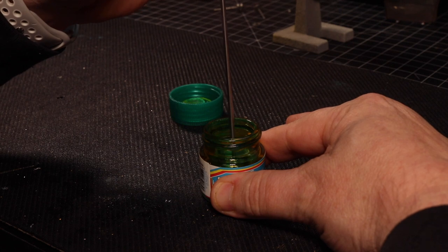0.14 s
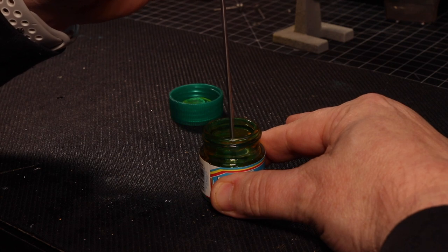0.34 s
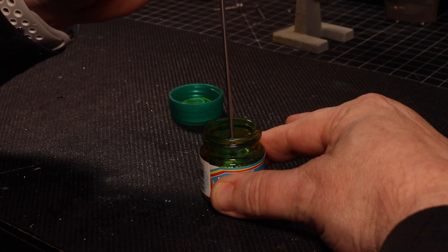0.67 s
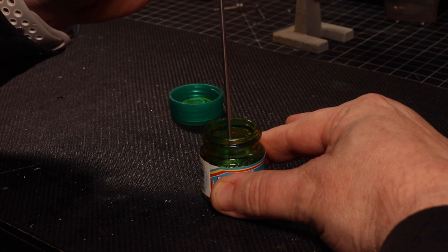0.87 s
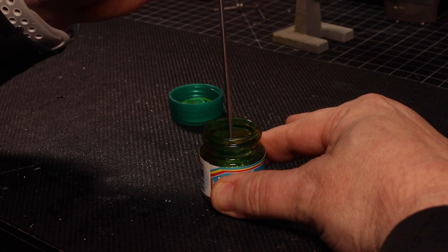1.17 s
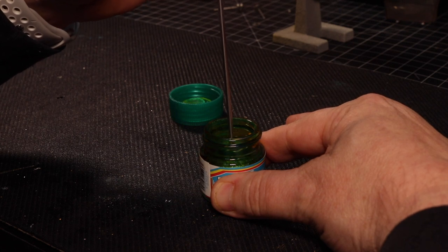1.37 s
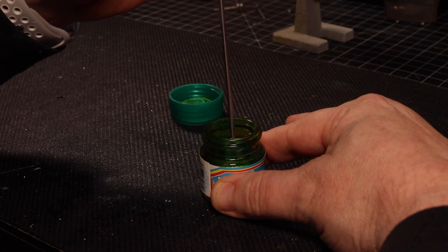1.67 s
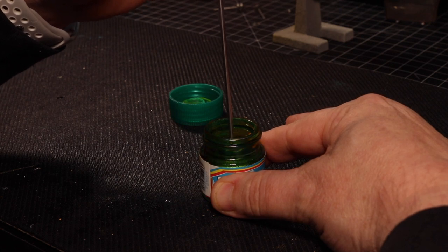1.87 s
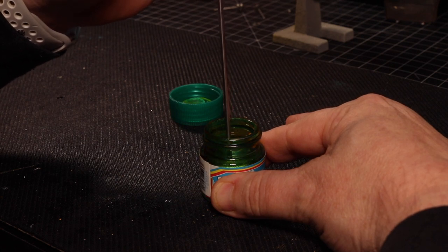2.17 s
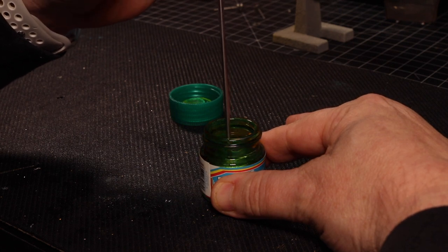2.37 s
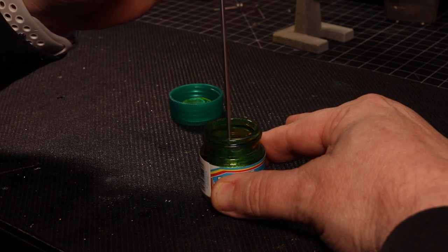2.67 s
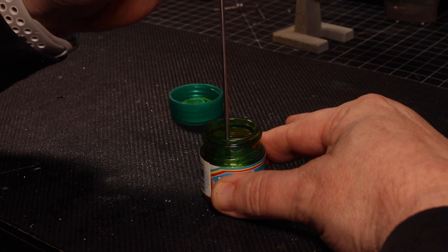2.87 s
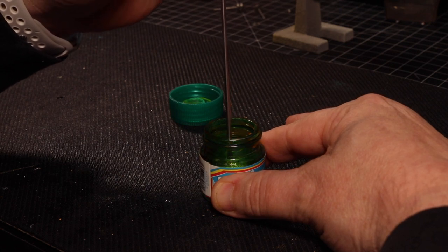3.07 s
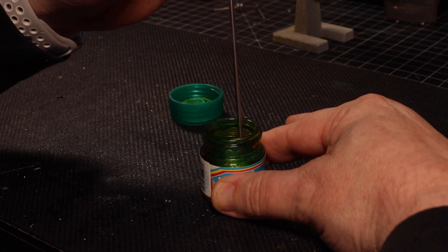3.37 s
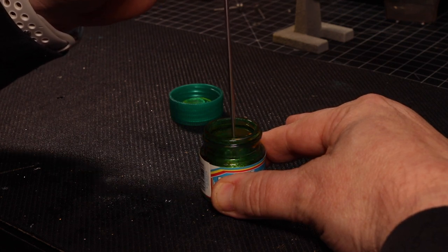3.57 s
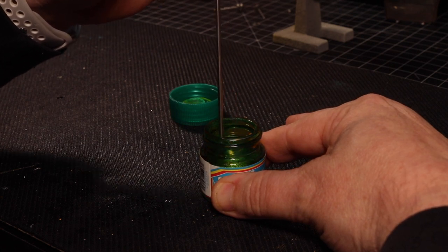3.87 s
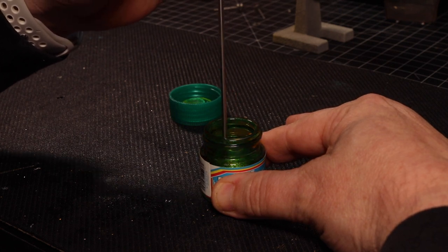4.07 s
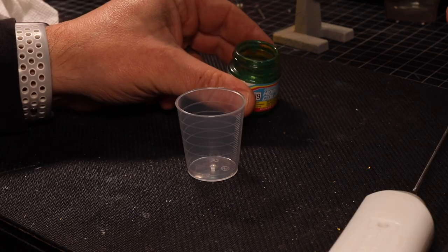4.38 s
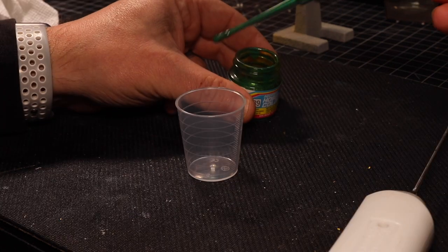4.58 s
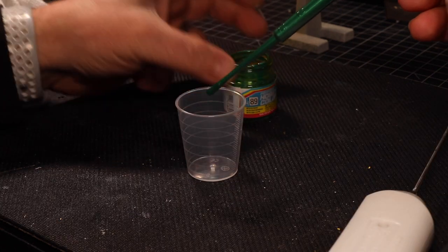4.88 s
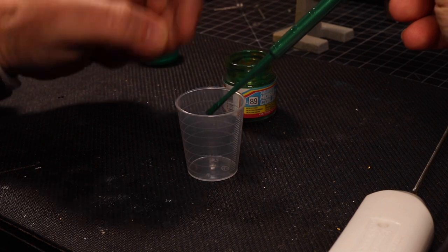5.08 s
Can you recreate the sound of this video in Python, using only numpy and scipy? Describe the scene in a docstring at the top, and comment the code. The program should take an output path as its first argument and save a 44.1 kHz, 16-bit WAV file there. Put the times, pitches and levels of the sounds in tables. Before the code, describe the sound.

A small battery mixer runs close to the microphone on a workbench, its motor giving a high whine while the thin shaft rattles rapidly. Paint fizzes and splatters inside a glass jar, mostly in the first two seconds. Later the paddle clatters against the glass three times. The mixer then cuts off suddenly, leaving a faint low room hum and a few light taps as the jar is handled.

```python
"""Close microphone on a workbench, where a small battery mixer stirs paint in a glass jar. From the start the
motor sings, its brushes click into a whine and the thin shaft rattles in its bearing. Bubbles fizz and droplets
splatter, most in the first two seconds. Near 2.9, 3.4 and 4.2 s the paddle clatters on the glass. Then the
scene changes to the quiet bench, with the room's low hum and a few light touches as the jar and a stirring
stick are handled."""
import sys
import numpy as np
from scipy import signal
from scipy.fft import rfft, irfft, next_fast_len
from scipy.io import wavfile
from scipy.ndimage import uniform_filter1d

SR = 44100
rng = np.random.default_rng(int(sys.argv[2]) if len(sys.argv) > 2 else 0)


def pcm_store(signal):
    """Save signal as 16-bit PCM."""
    levels = np.round(np.clip(np.atleast_2d(signal), -1, 1) * 32767)
    wavfile.write(sys.argv[1], SR, levels.astype(np.int16).T)


N = 231055
TIME = np.arange(N) / SR
SLOW_HZ, FAST_HZ = 183, 200  # the motor speeds meant by "slow" and "fast"

# The room's hiss. Each row: frequency in Hz, gain in dB.
ROOM_SPECTRUM = [(20, -20.5), (36, -13), (52, -17.5), (75, -8), (105, -6), (135, -15), (250, -15),
                 (520, -18), (1300, -22.5), (2500, -25.5), (6000, -28.5), (15500, -35.5)]
# Light touches on the bench. Each row: start in seconds, click in dB, thump in dB, click decay in seconds.
BENCH_TOUCHES = [(4.415, -48, -72, 0.0027), (4.82, -50, -35, .004), (4.88, -54, -62, 0.0081),
                 (4.925, -62, -70, .004), (4.992, -56, -46, .006), (5.002, -51, -56, 0.0049)]
# Fingers sliding on the jar. Each row: time in seconds, level in dB.
FINGER_SLIDE = [(4.8, -90), (4.87, -60), (4.93, -62), (5.0, -59.5), (5.06, -72), (5.24, -77)]
# A fingertip click. Each row: frequency in Hz, gain in dB.
CLICK_SPECTRUM = [(300, -11), (1000, -10), (1900, -6), (2400, -2), (2900, -2), (3600, -10), (6000, -18),
                  (15000, -28)]
# A thump on the mat. Each row: frequency in Hz, gain in dB.
THUMP_SPECTRUM = [(40, -19), (110, -1), (230, -0.5), (400, -3), (600, -26), (1500, -23), (5000, -49)]
# Paint thrown against the jar's wall. Each row: time in seconds, level in dB.
SPLATTER_LEVEL = [(0, -50.5), (.42, -52), (1.05, -50), (1.35, -44.5), (1.8, -42), (2.1, -44.5),
                  (2.3, -49.5), (4.2, -53)]
# The droplets' crackle. Each row: frequency in Hz, gain in dB.
DROPLET_SPECTRUM = [(1000, -26), (3400, -7.5), (4600, -1), (5700, -1), (6700, 2.5), (8500, -2.5),
                    (14000, -16.5)]
# How hard the paddle churns the paint. Each row: time in seconds, level in dB.
CHURN_LEVEL = [(0, -42.5), (.37, -48.5), (.43, -34), (.53, -36.5), (.6, -44), (.73, -40.5), (.81, -35),
               (.9, -38.5), (1.03, -41), (1.35, -36.5), (1.53, -38), (1.65, -41), (1.8, -37), (2.08, -35.5),
               (2.25, -44.5), (4.2, -65)]
# The paddle gulps air and the fizz swells. Each row: time in seconds, peak in dB.
AIR_GULPS = [(.335, -35), (.415, -33.5), (0.669, -30.5), (.765, -27.5), (0.979, -29), (1.115, -32),
             (1.17, -29.5), (1.29, -34), (1.4, -36), (1.55, -38), (1.79, -38), (1.91, -38), (1.97, -40)]
# Typical bubble pitch, lower as larger ones are beaten in. Each row: time in seconds, pitch in Hz.
BUBBLE_PITCH = [(.45, 2780), (.78, 2790), (1.15, 2650), (1.42, 2590), (1.55, 2800), (1.66, 2410),
                (1.95, 2560), (2.15, 2490)]
# Motor speed, sagging when the paddle drags. Each row: time in seconds, turns per second.
MOTOR_SPEED = [(0.0, 188.7), (0.09, 183.4), (0.22, 182.0), (0.51, 182.8), (0.56, 190.3), (0.63, 185.0),
               (0.73, 182.3), (0.82, 183.5), (0.86, 187.2), (1.07, 182.1), (1.09, 186.9), (1.18, 186.4),
               (1.23, 189.8), (1.33, 187.5), (1.45, 190.8), (1.53, 200.6), (1.55, 201.2), (1.61, 194.1),
               (1.77, 192.8), (1.86, 188.7), (1.96, 194.7), (2.09, 185.2), (2.27, 186.5), (2.34, 180.8),
               (2.4, 181.6), (2.41, 185.0), (2.48, 194.3), (2.6, 195.7), (2.84, 193.5), (2.94, 186.5),
               (3.17, 194.3), (3.35, 196.1), (3.43, 187.2), (3.52, 185.3), (3.57, 192.3), (3.66, 198.1),
               (4.1, 202.1), (4.19, 197.0)]
# The motor's tones. Each row: multiple of the speed, level in dB when slow, level in dB when fast.
MOTOR_TONES = [(1, -57, -63), (3, -61, -67), (5, -50.5, -53), (7, -43.5, -50), (8, -50, -44), (9, -52, -47),
               (10, -51, -57), (15, -55, -49), (18, -57, -49.5), (21, -46, -50), (24, -55, -66)]
# Response of shaft and handle. Each row: frequency in Hz, gain in dB.
HANDLE_RESPONSE = [(150, -21), (450, -24), (700, -16.5), (900, 0), (1250, 2.5), (1550, 0.5), (1900, -0.5),
                   (2250, -1.5), (2900, -2.5), (3600, -5), (4700, -5), (5700, -19.5), (6600, -13.5),
                   (8300, -21), (11500, -21), (13400, -10), (14700, -27), (16000, -33)]
# Brush clicks within one turn. Each row: share of the turn, relative level in dB.
BRUSH_CONTACTS = [(0, 0), (.1635, -7), (.3322, -1), (.4985, -8), (.6678, -3), (.829, -9)]
# Colour of the brush whine: the housing's resonances. Each row: frequency in Hz, gain in dB.
WHINE_COLOUR = [(2500, -30), (4500, -28), (5800, -30), (6800, -22), (8000, -22), (9000, -14),
                (9350, -7.5), (9620, -3.5), (9950, -10), (10300, -1), (10600, 1), (10950, -.5),
                (11300, -6.5), (11650, -15), (12100, -4.5), (12600, -12), (13150, -7.5), (13400, -9.5),
                (13900, -6.5), (14700, -23), (15500, -17)]
# Width of the whine at the microphone. Each row: frequency in Hz, side minus mid in dB.
WHINE_WIDTH = [(9000, -2), (11000, -22), (12200, -4), (14000, -3.5)]
# The bent shaft swings the paddle against the glass. Each row: start in seconds, relative level in dB.
PADDLE_KNOCKS = [(2.8791, -13), (2.885, -14.5), (2.89, -12), (2.8966, -11), (2.912, -10), (2.9165, -14.5),
                 (2.9228, -14.5), (2.9385, -14.5), (2.9436, -12), (2.9485, -13), (2.9653, -22),
                 (2.9801, -12), (2.9862, -15), (3.0066, -22), (3.011, -16), (3.023, -12.5), (3.0398, -13),
                 (3.05, -13), (3.0552, -17), (3.3522, -8), (3.358, -13), (3.3638, -14), (3.379, -14),
                 (3.3833, -9.5), (3.388, -13), (3.394, -13), (3.398, -9.5), (3.4098, -12.5), (3.414, -12.5),
                 (3.4201, -15), (3.4258, -15), (3.4311, -16), (3.437, -16), (3.442, -14), (3.4473, -16),
                 (3.4576, -12.5), (3.4638, -13), (3.4686, -13.5), (3.479, -12.5), (3.483, -10),
                 (3.4898, -10), (3.4947, -12), (3.4995, -11), (3.5049, -10), (3.51, -15), (3.518, -17),
                 (4.1628, -10), (4.168, -18), (4.1716, -10.5), (4.1835, -15.5), (4.2066, -27)]
# Resonances of the jar on the bench. Each row: frequency in Hz, width in Hz, gain in dB.
JAR_MODES = [(183.4, 18, -5), (215, 5.8, 2), (282.7, 6.3, 6.5), (394.3, 20.5, -0.5), (547, 67, 1),
             (720, 103, -2.5), (950, 207, -2), (1380, 240, -5.5), (1620, 60, -1.5), (1867, 115, -2),
             (2200, 250, -2.5), (2600, 456, 0), (2970, 222, 3.5), (3500, 390, -5.5), (4470, 240, -6.5),
             (4870, 280, -9.5), (7000, 3300, -16.5), (10500, 5100, -21), (13300, 570, -11.5)]


def undb(db):
    """Decibels to gain."""
    return np.exp(np.asarray(db) * (np.log(10) / 20))


def curve(rows):
    """Rows of (seconds, value) joined by straight lines."""
    return np.interp(TIME, *np.transpose(rows))


def unit(x):
    """Scale to rms 1."""
    return x / np.sqrt(np.mean(x ** 2))


def noise():
    """White noise."""
    return rng.standard_normal(N)


def wander(rate_hz):
    """A random line with a spread near 1 and rate_hz bends a second."""
    step = SR / rate_hz
    knots = rng.standard_normal(int(N / step) + 2)
    return np.sqrt(3 / 2) * np.interp(np.arange(N), step * np.arange(len(knots)), knots)


def ring(x, response):
    """Pass a sound through an impulse response."""
    return signal.oaconvolve(x, response)[:N]


def colour(x, spectrum, size=4096):
    """Minimum-phase filter with the given (Hz, dB) outline."""
    hz, db = np.transpose(spectrum)
    grid = np.maximum(np.fft.rfftfreq(size, 1 / SR), 1)
    cepstrum = irfft(np.log(undb(np.interp(np.log(grid), np.log(hz), db))))
    cepstrum[1:size // 2] *= 2
    cepstrum[size // 2 + 1:] = 0
    return ring(x, irfft(np.exp(rfft(cepstrum))))


def resonate(x, hz, width_hz):
    """One resonance, gain 1 at its centre."""
    return signal.lfilter(*signal.iirpeak(hz, hz / width_hz, fs=SR), x + 1e-18)


def clicks(times, sizes, order=8):
    """Sharp impulses placed between samples."""
    out, at = np.zeros(N), np.asarray(times)[:, None] * SR
    index = at.astype(int) + np.arange(1 - order, order + 1)
    shape = np.sinc(index - at) * np.sinc((index - at) / order)
    np.add.at(out, np.clip(index, 0, N - 1), shape * sizes[:, None])
    return out


def scuff(hits, decay_s):
    """A brief burst of contact noise after each impulse, with the same energy."""
    keep = np.exp(-2 / (decay_s * SR))
    return noise() * np.sqrt(signal.lfilter([1 - keep], [1, -keep], hits ** 2 + 1e-18))


def at_microphone(x, bench_db, room_db, bench_s=0.01, room_t60=0.2, pan_db=0):
    """Direct sound, scatter off the bench and a short room tail; the echoes share their bass."""
    t = TIME[:SR // 2]
    bench, tail = rng.standard_normal((2, 2, len(t)))
    bench = bench * np.exp(-t / bench_s) * (t > .0003)
    tail = tail * undb(-60 * t / room_t60) * (t > .006)
    bench *= undb(bench_db) / np.linalg.norm(bench)
    tail *= undb(room_db) / np.linalg.norm(tail)
    echoes = np.sqrt(2) * (bench + tail)
    bass = signal.sosfiltfilt(signal.butter(1, 350, fs=SR, output="sos"), echoes, padtype=None)
    echoes = echoes - bass + bass.mean(axis=0)
    return np.array([(x + ring(x, echo)) * undb(side * pan_db / 2) for side, echo in zip((1, -1), echoes)])


def side_signal(x, width):
    """A left-right difference a quarter cycle out of step, which widens a sound without moving it."""
    size = next_fast_len(N, True)
    gain = undb(np.interp(np.fft.rfftfreq(size, 1 / SR), *np.transpose(width)))
    return np.array([[1], [-1]]) * irfft(1j * gain * rfft(x, size), size)[:N]


def room_tone(hum_hz=54.0, hum_db=-60.0, hiss_db=-56.5):
    """All around the bench: a low, wavering hum and faint hiss, narrower in the bass."""
    hum = np.sqrt(2) * np.sin(2 * np.pi * hum_hz * TIME + 0.14 * wander(5.6))
    hum *= undb(hum_db + 0.48 * wander(6.3))
    mid, side = (unit(colour(noise(), ROOM_SPECTRUM)) for _ in range(2))
    side = 0.55 * side + .5 * signal.sosfilt(signal.butter(1, 700, "high", fs=SR, output="sos"), side)
    hiss = undb(hiss_db) * np.array([mid + side, mid - side])
    return np.array([[1.08], [.92]]) * (hum + hiss)  # leans slightly left


def handling(thump_s=0.0037):
    """Fingers and stick tap and slide on the jar; the jar bumps the mat."""
    click, thump = undb(curve(FINGER_SLIDE) + 3.3 * wander(70)), 0
    for start, click_db, thump_db, click_s in BENCH_TOUCHES:
        age = np.clip(TIME - start, 0, .2)
        click = click + undb(click_db) * (age > 0) * np.exp(-age / click_s)
        thump = thump + undb(thump_db) * (age > 0) * np.exp(-age / thump_s)
    hiss = noise()
    return sum(colour(force * hiss, body) / np.std(colour(hiss, body))
               for force, body in ((click, CLICK_SPECTRUM), (thump, THUMP_SPECTRUM)))


def splatter(scatter_db=5.5, count=12000):
    """Fine droplets flung off the paddle crackle against the wall of the jar."""
    drops = clicks(rng.uniform(0, TIME[-1], count), undb(-scatter_db * rng.standard_normal(count)))
    crackle = unit(colour(scuff(drops, decay_s=0.00025), DROPLET_SPECTRUM))
    return crackle * undb(curve(SPLATTER_LEVEL) + 2 * wander(45.17))


def churning(half_width_s=0.0063):
    """Strength of the fizz: the stirring plus a short swell at each gulp of air."""
    gulp_power = sum((undb(db) * np.exp(-.5 * ((TIME - at) / half_width_s) ** 2)) ** 2
                     for at, db in AIR_GULPS)
    return np.sqrt(undb(curve(CHURN_LEVEL)) ** 2 + gulp_power)


def paint_fizz(pitch_spread=0.1, decay_cycles=3.5, scatter_db=2.0, count=12000, size=384):
    """Tiny bubbles torn into the paint ping, each at its own pitch and gone in a few cycles."""
    start = rng.integers(0, N - size, count)
    detune, strength = rng.standard_normal((2, count, 1))
    hz = curve(BUBBLE_PITCH)[start, None] * np.exp(pitch_spread * detune)
    cycles = hz * np.arange(size) / SR
    peaks = undb(scatter_db * strength) * rng.choice([-1, 1], (count, 1))
    pings = peaks * np.exp(-cycles / decay_cycles) * np.cos(2 * np.pi * cycles)
    fizz = np.bincount((start[:, None] + np.arange(size)).ravel(), pings.ravel(), N)
    return unit(resonate(fizz, hz=2940, width_hz=2000)) * churning() * undb(0.81 * wander(59.9))


def motor_speed(inertia_s=0.022, tremble=0.00064):
    """Turns per second: the rotor's inertia rounds every change, and the speed trembles slightly."""
    steady = uniform_filter1d(curve(MOTOR_SPEED), int(inertia_s * SR), mode="nearest")
    return steady * (1 + tremble * wander(40))


def by_speed(speed, slow_db, fast_db):
    """A level in dB that follows the motor's speed in a straight line."""
    return slow_db + (fast_db - slow_db) * (speed - SLOW_HZ) / (FAST_HZ - SLOW_HZ)


def motor_tones(speed, turns, waver_db=0.93, flutter_turns=0.00077):
    """Imbalance and magnetic pull sing on multiples of the speed; rotor flutter roughens the high ones."""
    out = 0
    for multiple, slow_db, fast_db in MOTOR_TONES:
        db = by_speed(speed, slow_db, fast_db) + waver_db * wander(11)
        angle = 2 * np.pi * (multiple * (turns + flutter_turns * wander(70)) + rng.random())
        out = out + undb(db) * np.sqrt(2) * np.sin(angle)
    return out


def shaft_rattle(speed, turns, scatter_db=0.9, jitter_turns=0.1007, graze=1.03):
    """The whipping shaft ticks in its bearing every third or fourth turn and rubs in between."""
    count = int(turns[-1]) // 2
    tick_turns = np.cumsum(rng.choice([3, 4], count, p=[.78, .22]))
    tick_turns = tick_turns + .7 + jitter_turns * rng.standard_normal(count)
    sizes = undb(scatter_db * np.clip(rng.standard_normal(count), -2, 1))
    hits = clicks(np.interp(tick_turns, turns, TIME), sizes * (tick_turns < turns[-1]))
    ticks = unit(colour(hits + graze * scuff(hits, decay_s=0.0013), HANDLE_RESPONSE))
    friction = noise() * (1 + 0.28 * np.cos(2 * np.pi * turns)) * undb(wander(60))
    rub = unit(colour(friction, HANDLE_RESPONSE))
    return (undb(-34.5) * ticks + undb(-39.5) * rub) * undb(by_speed(speed, slow_db=-4, fast_db=-2))


def brush_whine(speed, turns, jitter_s=4e-6, drift_s=3e-6, scatter_db=0.6, spark_db=-11.5):
    """Two brushes drop over three commutator gaps a turn; each contact sparks and rings the housing."""
    share, db = np.transpose(BRUSH_CONTACTS)
    whole_turns = np.arange(int(turns[-1]) - 1)
    times = np.interp(whole_turns[:, None] + share, turns, TIME)
    drift = np.transpose([np.interp(contact, TIME, wander(6.05)) for contact in times.T])
    jitter, strength = rng.standard_normal((2, *times.shape))
    times = times + jitter_s * jitter + drift_s * drift
    hits = clicks(times.ravel(), undb(db + scatter_db * strength).ravel())
    sparks = undb(spark_db) * scuff(hits, decay_s=.0005)
    return unit(colour(hits + sparks, WHINE_COLOUR)) * undb(by_speed(speed, slow_db=-34, fast_db=-33))


def paddle_clatter(gain_db=24.0, scrape=0.79, chatter_db=-5.0):
    """The paddle strikes the glass, scrapes along it and rings jar and bench."""
    times, knock_db = np.transpose(PADDLE_KNOCKS)
    hits = clicks(times, undb(knock_db + gain_db))
    push = hits + scrape * scuff(hits, decay_s=0.0023) + undb(chatter_db) * scuff(hits, decay_s=0.012)
    # neighbouring modes swing in opposite directions
    return sum((-1) ** k * undb(db) * resonate(push, hz, width)
               for k, (hz, width, db) in enumerate(JAR_MODES))


def scene(stop_s=4.211):
    """The mixer close to the stereo microphone until stop_s, then the quiet bench."""
    speed = motor_speed()
    turns = np.cumsum(speed) / SR
    tones = motor_tones(speed, turns)  # these reach the microphone directly
    stirring = shaft_rattle(speed, turns) + paint_fizz() + splatter()
    mixer = tones + at_microphone(stirring, bench_db=-4.5, room_db=-8.5, bench_s=0.0053, pan_db=0.24)
    whine = brush_whine(speed, turns)
    mixer += side_signal(whine, WHINE_WIDTH)
    mixer += at_microphone(whine, bench_db=-14, room_db=-12, bench_s=0.0006, pan_db=-1.5)
    mixer += at_microphone(paddle_clatter(), bench_db=-8, room_db=-11, bench_s=0.0025,
                           room_t60=0.32, pan_db=0.2)
    mixer *= np.exp(-np.clip(TIME - stop_s, 0, .1) / .003)
    touches = at_microphone(handling(), bench_db=-7, room_db=-6, room_t60=0.28)
    return mixer + touches + room_tone()


def record(dry):
    """The recorder cuts the treble steeply above 15.9 kHz."""
    return signal.sosfilt(signal.ellip(10, .1, 80, 15900, fs=SR, output="sos"), dry)


dry = scene()
out = record(dry)
pcm_store(out)
```